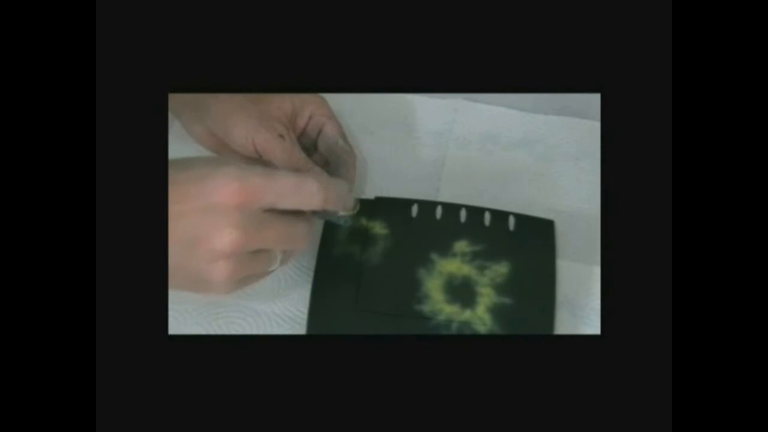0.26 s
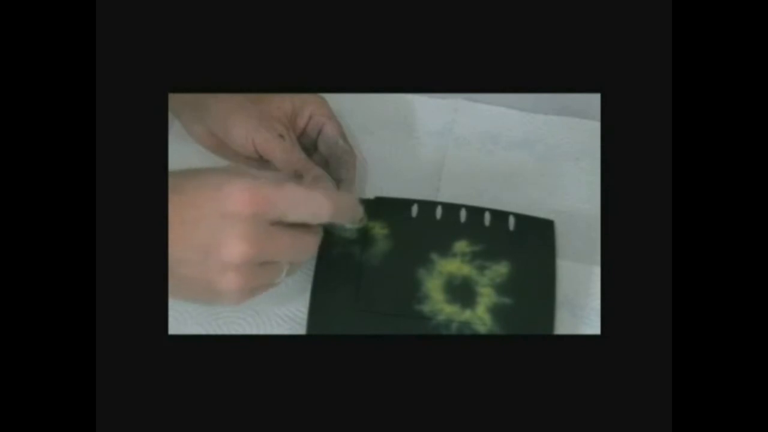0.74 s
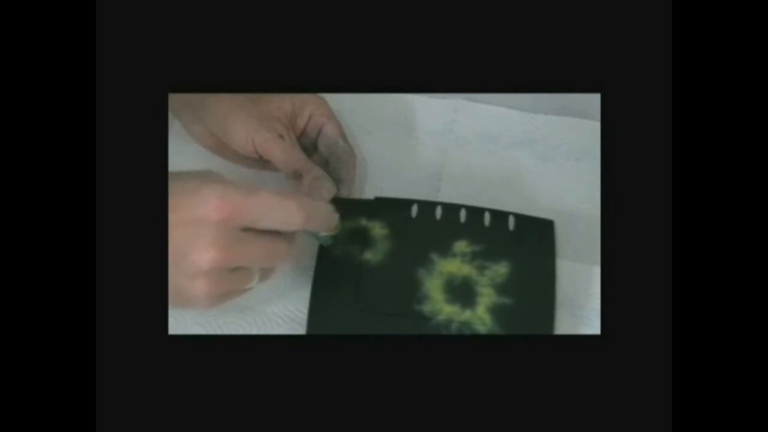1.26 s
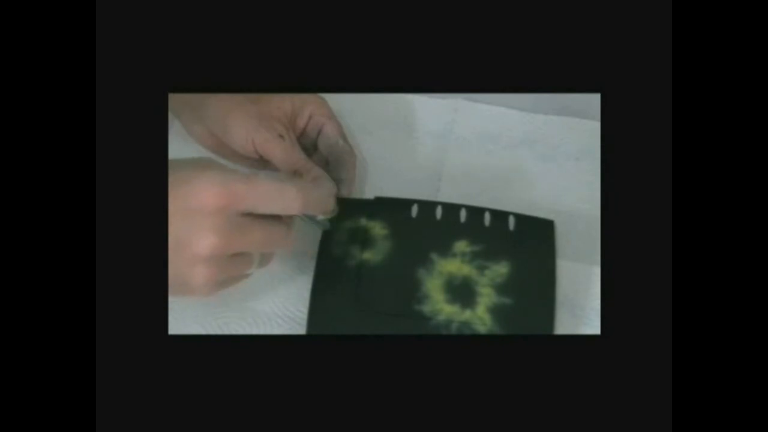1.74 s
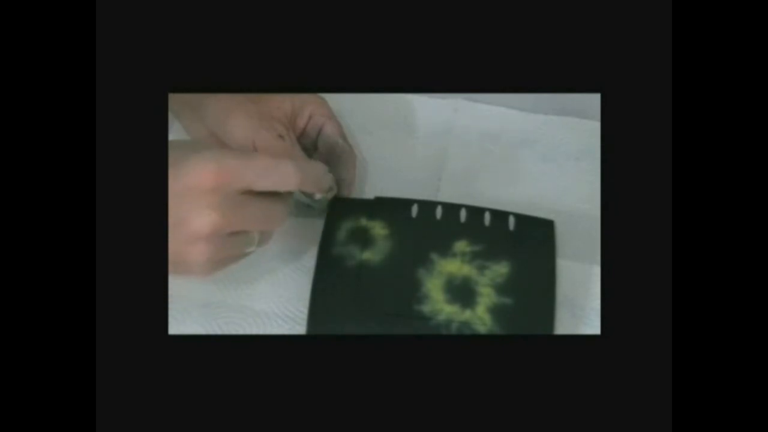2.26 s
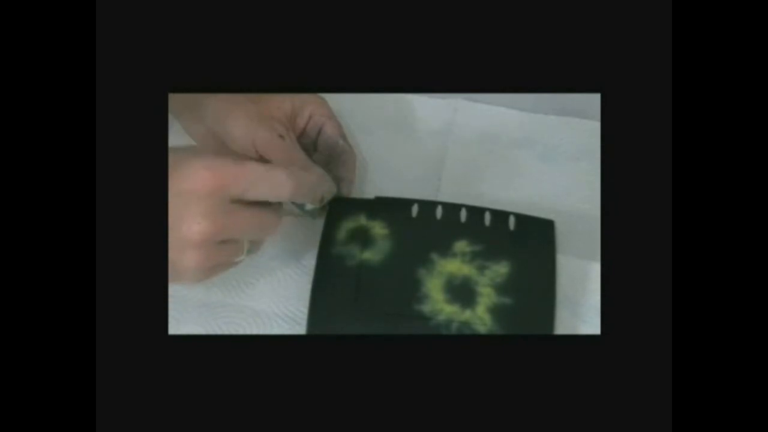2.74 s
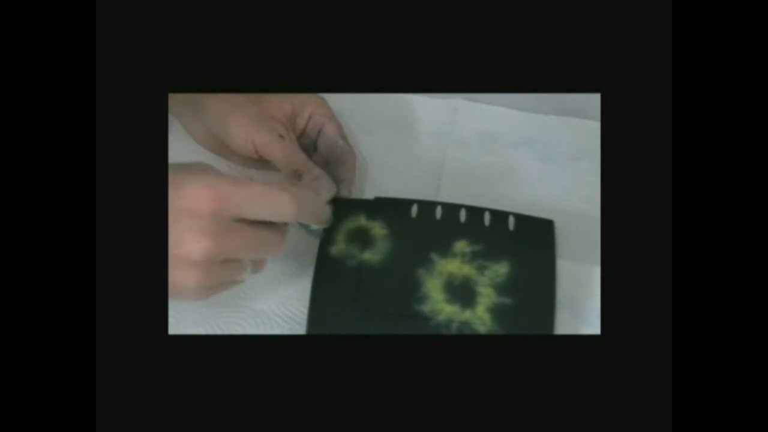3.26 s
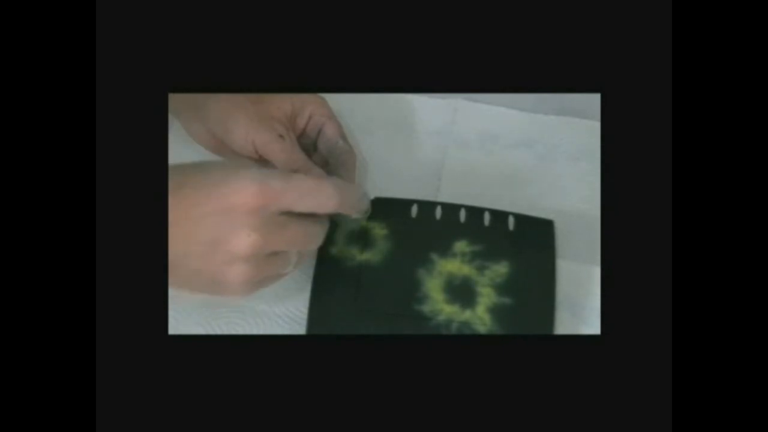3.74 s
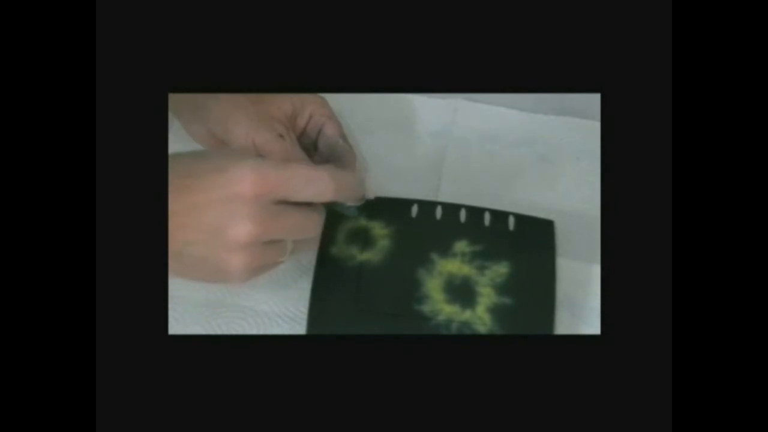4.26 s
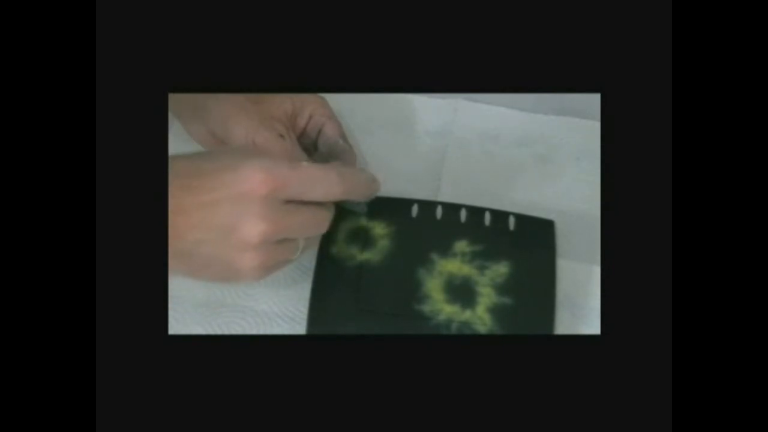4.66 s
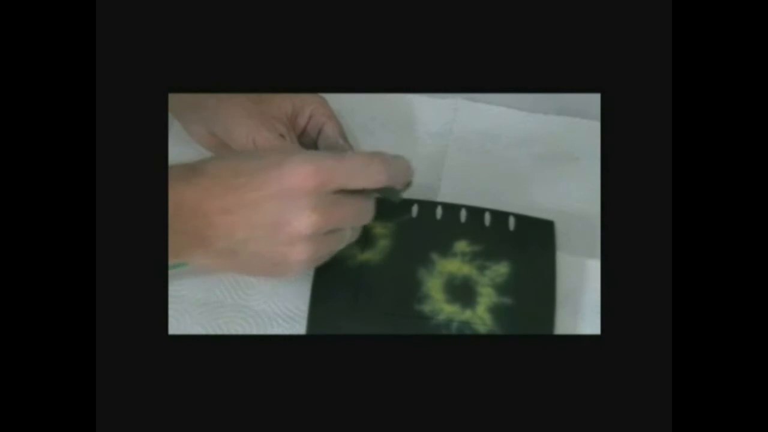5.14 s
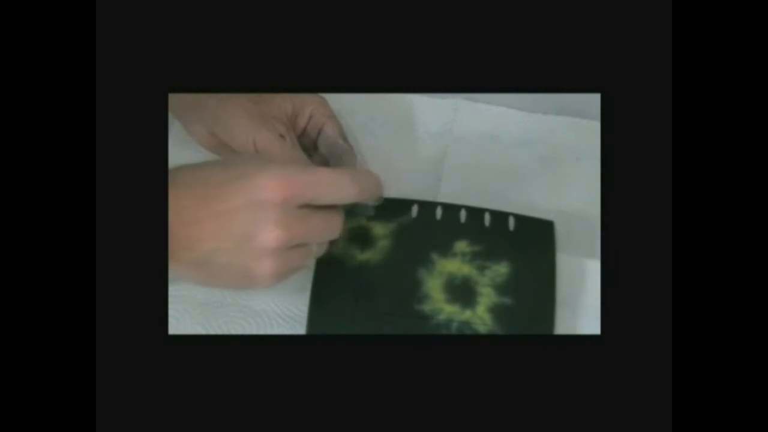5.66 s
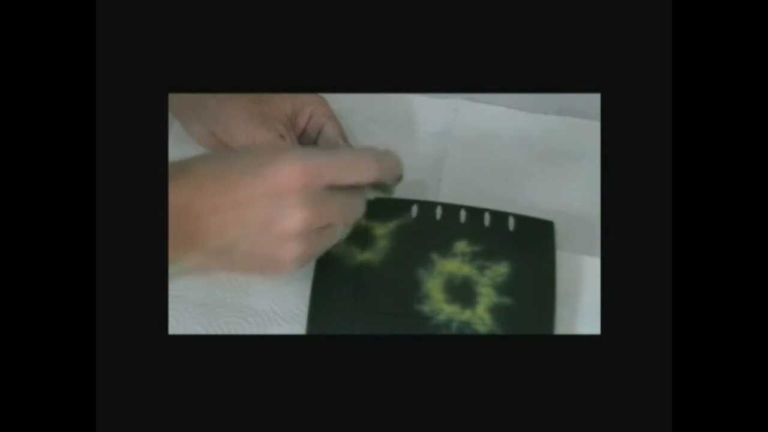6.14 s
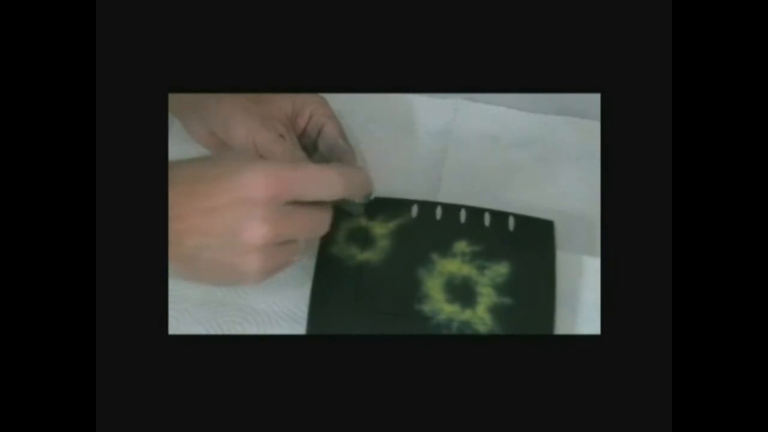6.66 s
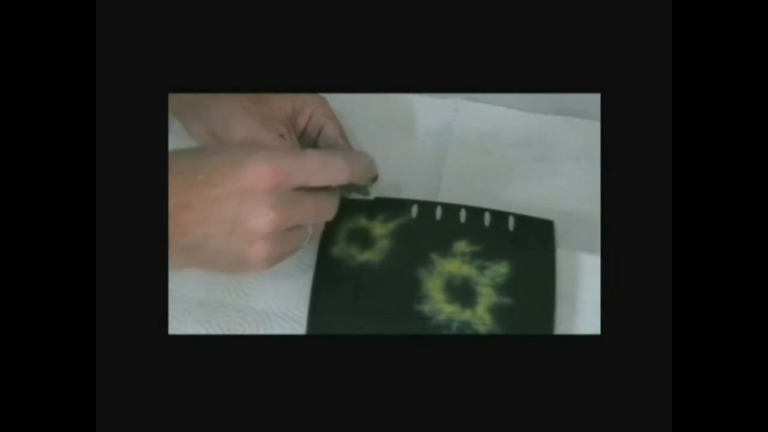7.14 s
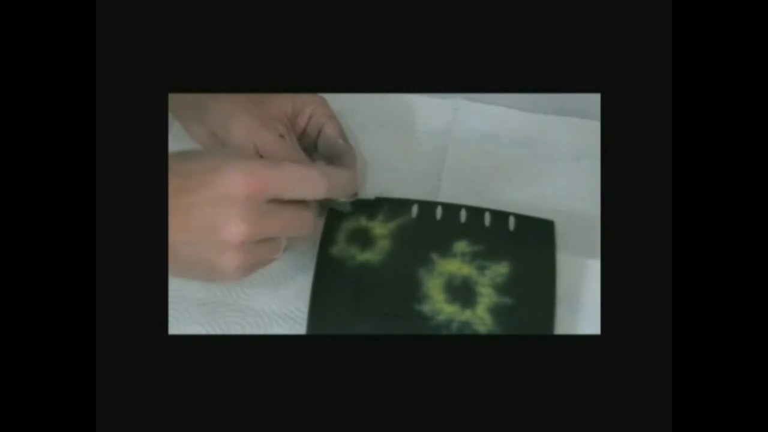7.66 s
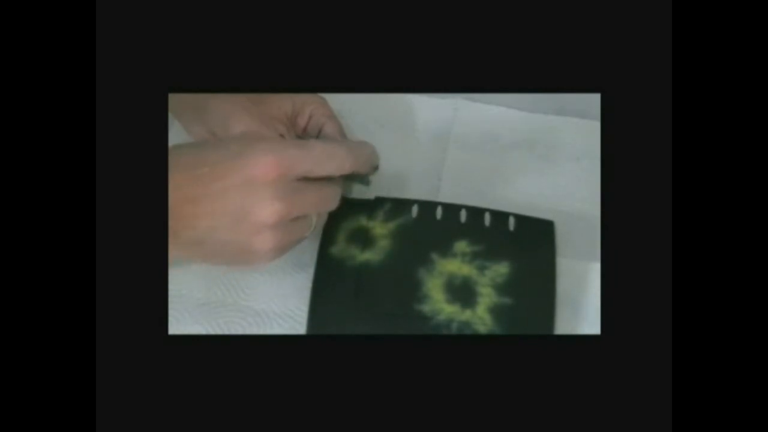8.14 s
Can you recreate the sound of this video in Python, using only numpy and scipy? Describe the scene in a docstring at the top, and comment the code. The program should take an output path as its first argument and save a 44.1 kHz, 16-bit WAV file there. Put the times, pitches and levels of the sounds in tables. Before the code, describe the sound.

Continuous pressurised air hiss, crisp and fine-grained, with soft low-mid swells as the jet passes over a panel on a table. Then come abrupt stops and restarts: several quick puffs, louder and fuller, with rushing turbulence hitting the surface. The last spray is held to the end. Close stereo perspective, quiet room, slight ringing from nearby surfaces and a short dull reverberation.

```python
"""In a quiet room, close to a stereo microphone, an airbrush paints a small panel on a paper-covered table.
The nozzle hisses steadily, then in short spurts: free-jet turbulence is noise with a smooth, bright spectrum.
Passes over the panel add a turbulent roar, noise that swells and changes colour with each impact.
Nearby surfaces ring and comb the spray, the room adds a tail, and faint room noise and a low hum lie below."""
import sys
import numpy as np
from scipy import signal
from scipy.fft import rfft, irfft, next_fast_len
from scipy.io import wavfile
from scipy.ndimage import map_coordinates

SR = 44100
rng = np.random.default_rng(int(sys.argv[2]) if len(sys.argv) > 2 else 0)


def wav_out(sig):
    """Save sig, one row per channel (or a flat mono array), as 16-bit PCM at SR to the path in sys.argv[1]."""
    wavfile.write(sys.argv[1], SR, np.round(np.clip(np.atleast_2d(sig).T, -1, 1) * 32767).astype(np.int16))


N = 370525
TIME = np.arange(N) / SR  # s
PADDED = next_fast_len(N + SR // 2)
BINS = np.arange(PADDED // 2 + 1) * SR / PADDED  # Hz


# relative spectrum of the free jet: [frequency_hz, density_db]
HISS_SPECTRUM = [(100.0, -21.5), (300.0, -7), (600.0, -8), (1200.0, -6), (1700.0, -3), (2500.0, 0.5),
                 (4000.0, 0.5), (7000.0, 2.5), (9500.0, 3), (11000.0, 3), (14000.0, -3)]
HISS_DB = -27.5  # at full flow, before colouring


def nozzle(level_db, flutter_db=0.79):
    """Jet noise: the fine turbulence of the free jet radiates a smooth, bright hiss."""
    gain_db = HISS_DB + level_db + flutter_db * walk(30, TIME)
    return recoloured(air(HISS_SPECTRUM), nozzle_colour) * undb(gain_db)


# treble peaks and hollows of the nozzle cap: [centre_hz, half_width_hz, level_db]
CAP_BANDS = [(4720, 170, 1.6), (6870, 200, 2.2), (9300, 250, -1.8), (13050, 350, 1)]
# the hand slowly turns the nozzle: [time_s, sharp_band_hz, sharp_band_db, top_treble_db]
NOZZLE_AIM = [(0, 10000, 4.5, 3), (.4, 10000, 1, .8), (.65, 8750, 2.5, 3.2), (1.75, 8750, 5.5, 2.3),
              (2.35, 8750, 0, .2), (2.8, 8750, 6.5, 1.8), (3.45, 8780, 6.5, 3), (3.8, 9350, 5, .9),
              (5, 10000, 1.5, -1.7), (8.4, 10050, 2.5, -1)]


def nozzle_colour(hz, t, top_hz=11500):
    """Resonance and directivity: the cap rings in a few bands; a sharp band and the top follow the aim."""
    centre_hz, height_db, top_db = over_time(NOZZLE_AIM, t)
    sharp_band = (centre_hz, 200, height_db)
    top_tilt_db = top_db * np.minimum(hz / top_hz, 1) ** 2
    return bands([*CAP_BANDS, sharp_band], hz) + top_tilt_db + ripple(hz, t)


# the trigger is eased off and pressed again:
# [closing_start_s, closing_db_per_s, fully_open_s, opening_db_per_s, least_flow_db]
TRIGGER_PAUSES = [(4.406, 200, 4.728, 190, -40), (5.128, 240, 5.268, 550, -13),
                  (5.666, 265, 5.812, 405, -30), (6.198, 155, 6.358, 270, -21),
                  (6.585, 285, 6.818, 290, -40), (7.12, 370, 7.254, 700, -26)]


def flow(t):
    """Valve throttling: flow in dB, full while the trigger is held, ramping down and up in each pause."""
    total_db = 0
    for start, closing, end, opening, least in TRIGGER_PAUSES:
        ramps_db = np.maximum(closing * (start - t), opening * (t - end))
        total_db = total_db + np.clip(ramps_db, least, 0)
    return total_db


# relative spectrum of the jet on the panel: [frequency_hz, density_db]
ROAR_SPECTRUM = [(100, -50.5), (300, -24.5), (550, -12.5), (850, -9), (1250, 0.5), (1450, -0.5), (1750, -7),
                 (2650, -6.5), (2950, -16.5), (3350, -15), (4400, -21.5), (7000, -30), (13000, -42)]


def panel(level_db, waver_db=0.47, eddy_db=0.83):
    """Impinging-jet noise: larger eddies break into a roar, wavering with the hand and grainy within."""
    unrest_db = waver_db * walk(22, TIME) + eddy_db * walk(260, TIME)
    return recoloured(air(ROAR_SPECTRUM), panel_colour) * undb(level_db + unrest_db)


# treble peaks and hollows of the jet on the panel: [centre_hz, half_width_hz, level_db]
PANEL_BANDS = [(4720, 150, -4.5), (5270, 200, 3), (5950, 200, -2), (7250, 200, 2)]


def panel_colour(hz, t, low_hz=850, pivot_hz=1200, high_hz=6300, edge_hz=3100):
    """Spectral tilt: brightness follows each impact; a treble shelf sizzles where the jet splits on an edge."""
    _, brightness, edge_db = impact(t)
    octaves = np.log2(np.clip(hz, low_hz, high_hz) / pivot_hz)
    sizzle_db = edge_db * hz ** 8 / (hz ** 8 + edge_hz ** 8)
    return brightness * octaves + sizzle_db + bands(PANEL_BANDS, hz) + ripple(hz, t)


# the jet sweeps onto the panel and off again:
# [closest_s, approach_s, retreat_s, roar_db, brightness_db_per_octave, edge_sizzle_db]
PANEL_PASSES = [(0.429, 0.15, 0.14, -34, -11, -0.1), (1.115, 0.24, 0.165, -38, 5, 0.1),
                (1.569, 0.098, 0.14, -38, 6.9, 3), (2.014, 0.18, 0.209, -32.5, -6, 1.1),
                (2.436, 0.14, 0.201, -28.5, -3.5, 11), (2.706, 0.11, 0.17, -34, -2, 1.2),
                (3.038, 0.12, 0.146, -32.5, 3.5, 5), (3.514, 0.21, 0.098, -38, 11, 3.8),
                (4.02, 0.12, 0.118, -25, -0.5, 2.1), (4.419, 0.12, 0.109, -24.5, -0.4, 0),
                (4.768, 0.12, 0.13, -27, -0.5, 3), (5.076, 0.186, 0.12, -22.0, 8, 3.0),
                (5.29, 0.13, 0.046, -18.4, 7.3, -2.5), (5.414, 0.116, 0.18, -22.5, 5.7, -1.5),
                (5.928, 0.085, 0.088, -26.5, 0.5, -3.7), (6.106, 0.14, 0.067, -22, 8.5, 4.3),
                (6.179, 0.071, 0.111, -18.6, 5.2, -5.5), (6.365, 0.11, 0.14, -20.0, 4.5, -1.5),
                (7.093, 0.185, 0.1, -21.6, -0.5, -8), (7.277, 0.092, 0.18, -24, -1.5, 0),
                (7.68, 0.088, 0.11, -34.5, 14, 13), (7.877, 0.14, 0.199, -22.5, 0.5, 0.5),
                (8.151, 0.2, 0.14, -21, 1.2, -5)]
FADE_DB, PASS_SHAPE = 5.5, 1.63  # fall one approach or retreat away; shape 1 = pointed, 2 = rounded
DULLING = 0.68  # brightness lost (dB per octave) for each dB that a pass has faded
GRAZE_DB, GRAZE_BRIGHTNESS = -44.5, -9.3  # between passes the jet only grazes (dB, dB per octave)


def impact(t):
    """Power addition: roar dB, brightness and sizzle at full flow; the strongest pass sets the colour."""
    columns = np.transpose(PANEL_PASSES)[:, :, None]
    at, approach, retreat, peak_db, brightness, sizzle_db = columns
    distance = np.abs(t - at) / np.where(t < at, approach, retreat)
    faded_db = FADE_DB * np.minimum(distance, 10) ** PASS_SHAPE
    power, graze = undb(peak_db - faded_db) ** 2, undb(GRAZE_DB) ** 2
    total = power.sum(0) + graze
    # the colours are averaged with the powers as weights
    colour = (power * (brightness - DULLING * faded_db)).sum(0) + graze * GRAZE_BRIGHTNESS
    return 10 * np.log10(total), colour / total, (power * sizzle_db).sum(0) / total


# a close reflection off the work comes sooner as the turning nozzle raises its sharp band
BOUNCE_S, BOUNCE_AT_HZ, BOUNCE_S_PER_HZ = .00104, 8750, -4.5e-8
STILL_ECHO_S = .000638


def ripple(hz, t, least_db=0.6, depth_share=0.12, still_db=0.1, sway=0.018, count=8):
    """Comb interference (dB): one reflection follows the aim, one stands still, many weak ones sway."""
    centre_hz, height_db, _ = over_time(NOZZLE_AIM, t)
    delay = BOUNCE_S + BOUNCE_S_PER_HZ * (centre_hz - BOUNCE_AT_HZ)
    depth_db = least_db + depth_share * height_db
    turn = 2 * np.pi * hz
    clutter_db = 0
    for lag in rng.uniform(.0013, .005, count):  # s
        swaying_lag = lag * (1 + sway * walk(1.5, t))
        clutter_db = clutter_db + .45 * np.cos(turn * swaying_lag)
    # fingers and small things reflect only the treble
    small_things = hz ** 2 / (hz ** 2 + 2000 ** 2)
    bounce_db = depth_db * np.cos(turn * delay)
    return bounce_db - still_db * np.cos(turn * STILL_ECHO_S) + small_things * clutter_db


# resonances of table and room round the jet: [frequency_hz, width_hz, ringing_to_direct_db]
RING_MODES = [(566, 22, -7), (780, 30, -10), (861, 14, 0), (996, 18, -9), (1038, 12, -7), (1130, 24, -8),
              (1227, 20, -7), (1277, 16, -3), (1550, 40, -8), (1863, 28, -8), (2020, 60, -13),
              (2218, 50, -10), (2541, 50, -11), (2746, 40, -11), (3450, 130, -13)]
# broad hollows in the treble: [frequency_hz, width_hz, share_removed (0-1)]
TREBLE_HOLLOWS = [(7770, 210, 0.23), (10980, 720, 0.5)]


def nearby_surfaces(x):
    """Modal resonance: nearby surfaces ring at their own frequencies and hollow the treble."""
    response = 1 + sum(undb(db) * resonance(hz, width) for hz, width, db in RING_MODES)
    for hz, width, share in TREBLE_HOLLOWS:
        response = response * (1 - share * resonance(hz, width))
    return filtered(x, response)


# echo of the room against the sound it follows: [frequency_hz, level_db]
ROOM_ECHO = [(200, -5.5), (1100, -4.5), (2500, -14), (5000, -10), (12000, -19)]
ROOM_T60_S = 0.57


def room_echo(x, gap_s=0.0038):
    """Reverberation: a diffuse, exponentially decaying tail, dull because the treble returns weakly."""
    mid, side = rng.standard_normal((2, N))
    side = filtered(side, side_gain())  # the close capsules catch much the same echoes
    decay = np.exp(-np.log(1000) * TIME / ROOM_T60_S) * (TIME > gap_s)
    tail = np.array([mid + side, mid - side]) * decay
    tail /= np.sqrt(np.sum(tail ** 2, axis=1, keepdims=True))  # unit energy
    dulled = filtered(x, undb(over_hz(ROOM_ECHO, BINS)))
    return signal.fftconvolve(dulled, tail, axes=1)[:, :N]


def surroundings(x):
    """Superposition: the ringing direct sound and its room echo add."""
    ringing = nearby_surfaces(x)
    return ringing + room_echo(ringing)


# relative spectrum of the still room: [frequency_hz, density_db]
STILL_SPECTRUM = [(25, -6.5), (70, -2.5), (140, -6.5), (250, 1), (500, -0.5), (1000, -21), (3000, -12.5),
                  (10000, -17.5), (14000, -43)]
STILL_DB = -55.5
HUM_HZ, HUM_DB = 101.6, -67  # mean pitch; rms level about which the hum wavers


def still_room(waver_db=2.5, wander=0.44):
    """Background noise and modulation: faint noise, and a low hum wavering in level and phase (radians)."""
    phase = 2 * np.pi * HUM_HZ * TIME + wander * walk(8.3, TIME)
    hum = np.sqrt(2) * np.sin(phase) * undb(HUM_DB + waver_db * walk(7.3, TIME))
    return air(STILL_SPECTRUM) * undb(STILL_DB) + hum


def air(spectrum):
    """Partial coherence: stereo noise of a given spectrum, its shared part at rms 1, its sides by frequency."""
    mid, side = rng.standard_normal((2, N))
    colour = undb(over_hz(spectrum, BINS))
    mid, side = filtered(mid, colour), filtered(side, colour * side_gain())
    return np.array([mid + side, mid - side]) / np.std(mid)


# likeness of the two channels: [frequency_hz, correlation (0-1)]
CHANNEL_LIKENESS = [(60, .66), (300, .78), (650, .91), (1300, .93), (1900, .72), (2500, .76), (4000, .64),
                    (7500, .63), (10800, .45), (13500, .6)]


def side_gain():
    """Interchannel correlation: side against mid, by frequency, that gives the channels their likeness."""
    alike = np.clip(over_hz(CHANNEL_LIKENESS, BINS), 0, 1)
    return np.sqrt((1 - alike) / (1 + alike))


def recoloured(x, colour_db):
    """Time-varying filtering: shape short-time spectra with colour_db(Hz column, s row)."""
    hz, t, frames = signal.stft(x, SR, nperseg=1024)
    shaped = frames * undb(colour_db(hz[:, None], t))
    return signal.istft(shaped, SR, nperseg=1024)[1][:, :N]


def bands(table, hz):
    """Resonance curves: the summed dB of a few bell-shaped peaks and hollows."""
    return sum(db / (1 + ((hz - centre) / width) ** 2) for centre, width, db in table)


def resonance(hz, width):
    """Simple resonator: band-pass response of gain 1 at the centre."""
    return 1j * BINS * width / (hz ** 2 - BINS ** 2 + 1j * BINS * width)


def filtered(x, response):
    """Linear filtering: multiply the spectrum by a frequency response."""
    return irfft(rfft(x, PADDED) * response, PADDED)[..., :N]


def walk(rate, t):
    """Random modulation: smooth chance of spread near 1, with rate fresh values a second."""
    return map_coordinates(rng.standard_normal(4096), [t * rate], order=3, mode="wrap")


def over_time(table, t):
    """Linear interpolation: the columns of a curve at the times t."""
    s, *columns = np.transpose(table)
    return [np.interp(t, s, c) for c in columns]


def over_hz(table, hz):
    """Logarithmic pitch scale: a spectrum read on a log-frequency axis."""
    points, values = np.transpose(table)
    return np.interp(np.log(np.maximum(hz, 1)), np.log(points), values)


def undb(db):
    """Decibel law: decibels to amplitude gain."""
    return 10 ** (np.asarray(db) / 20)


HISS_STEEPNESS = 1.3  # dB of hiss for each dB of flow
SMOTHER_DB = -19.5  # full-flow roar at which the panel takes half the power of the free hiss


def scene():
    """Common drive: the trigger feeds hiss and roar; very close to the panel the free jet is smothered."""
    t = TIME[::64]  # levels move slowly enough for a coarse grid
    flow_db, roar_db = flow(t), impact(t)[0]
    smothered_db = 10 * np.log10(1 + undb(roar_db - SMOTHER_DB) ** 2)
    hiss_db = HISS_STEEPNESS * flow_db - smothered_db
    hiss = nozzle(np.interp(TIME, t, hiss_db))
    roar = panel(np.interp(TIME, t, roar_db + flow_db))
    return surroundings(hiss + roar) + still_room()


# left against right: [frequency_hz, level_db]
CHANNEL_LEAN = [(60, 0.5), (200, 3.5), (370, 4), (680, 3.5), (1250, 0), (2300, -.5), (4200, -1.3),
                (7700, -1.5), (14000, 0)]


def record(dry, depth=0.59, hold=0.82, fade_hz=3600, top_hz=14150):
    """Recorder and microphone response: a recorder's noise-cancelling comb dips every 300 Hz,
    fading upward; unequal capsules and a cut top."""
    turn = np.exp(-2j * np.pi * BINS / 300)
    hold = np.clip(hold, 0, .95)  # nearer 1 = narrower dips
    comb = (1 - hold) / (1 - hold * turn)
    dips = 1 - depth * comb / (1 + (BINS / fade_hz) ** 4)
    lean = undb(np.array([[1], [-1]]) * over_hz(CHANNEL_LEAN, BINS) / 2)
    low_pass = signal.ellip(14, .2, 80, top_hz, fs=SR, output="sos")
    return signal.sosfilt(low_pass, filtered(dry, dips * lean))


dry = scene()
out = record(dry)
wav_out(out)
```